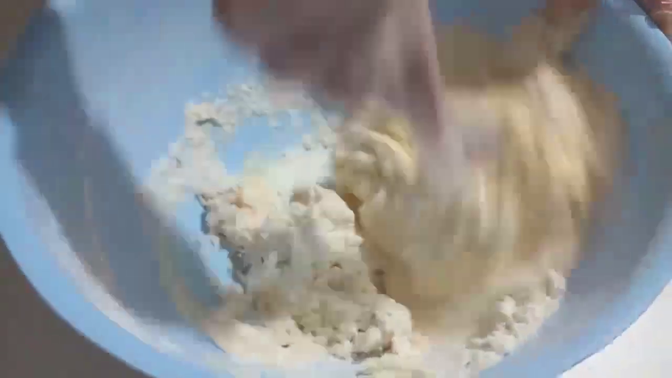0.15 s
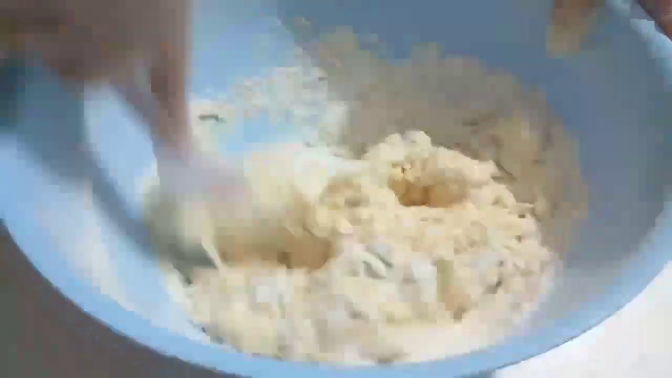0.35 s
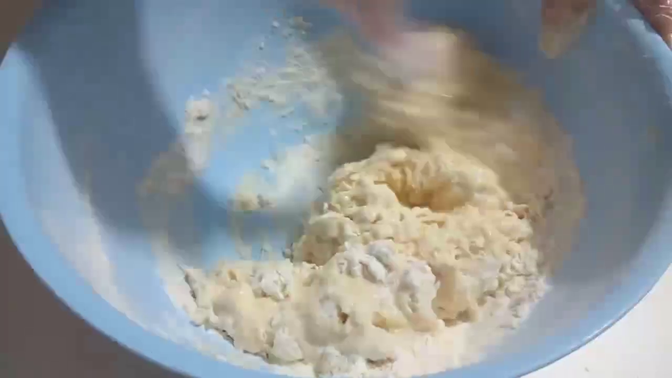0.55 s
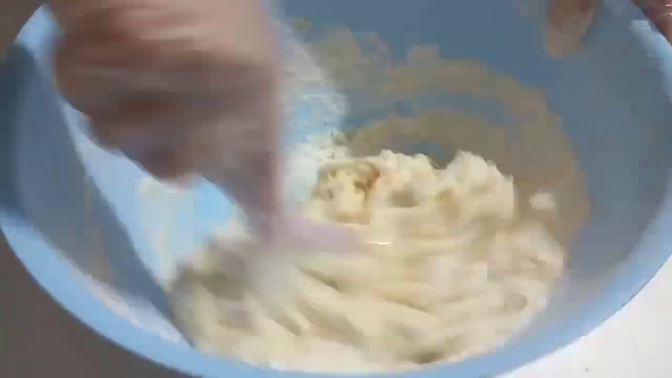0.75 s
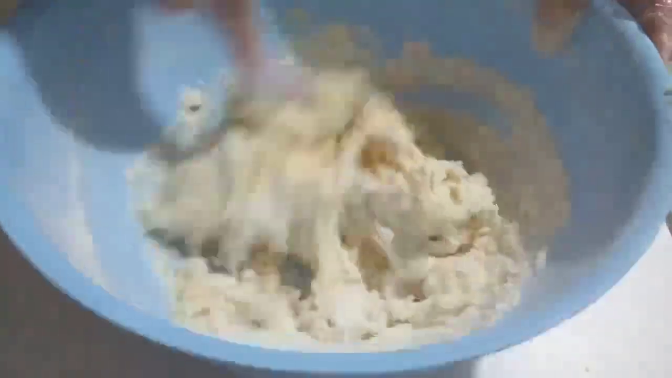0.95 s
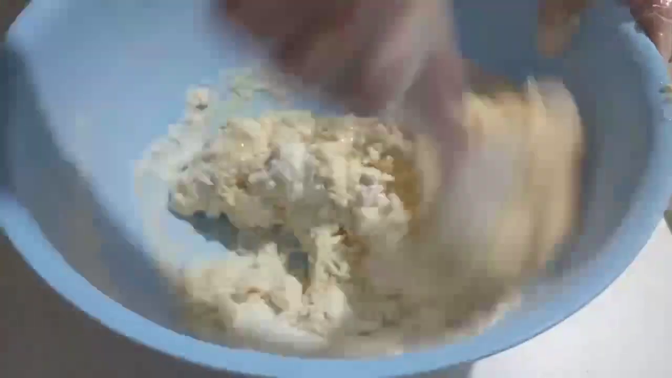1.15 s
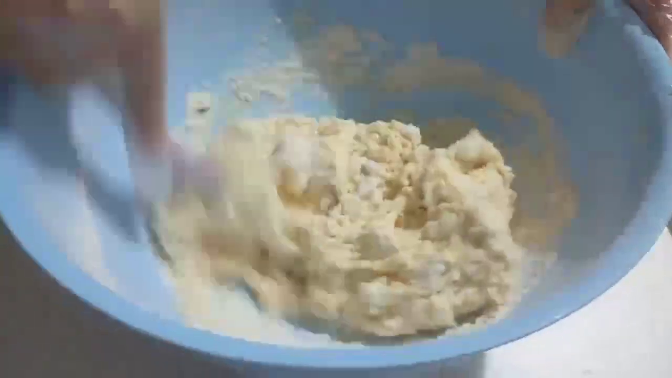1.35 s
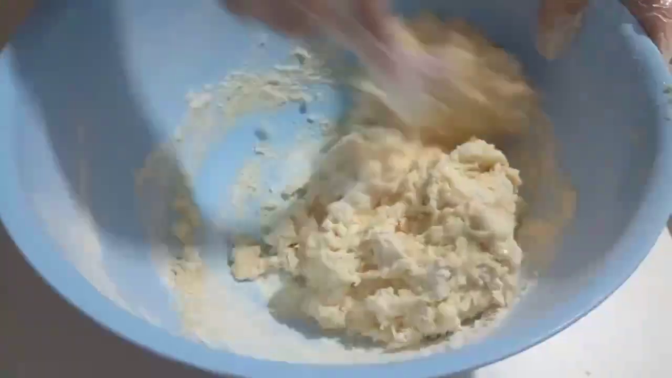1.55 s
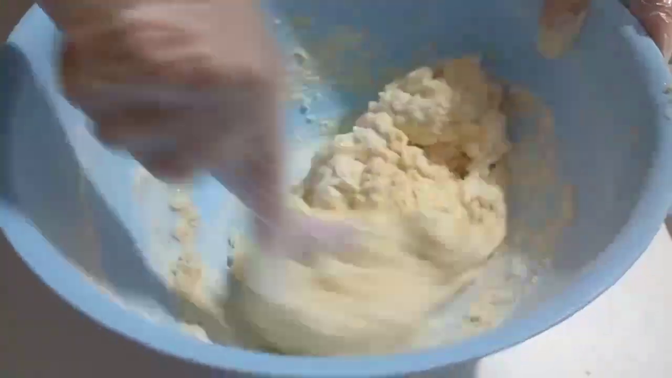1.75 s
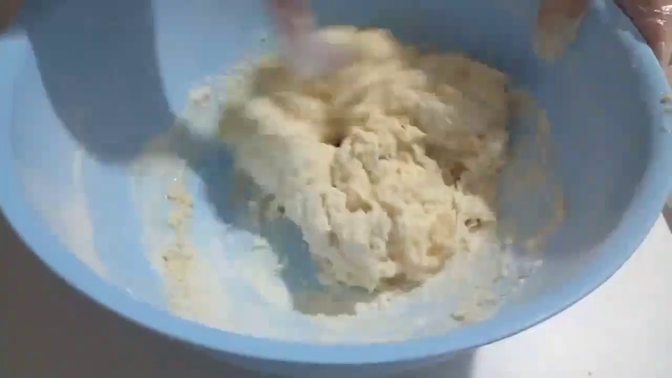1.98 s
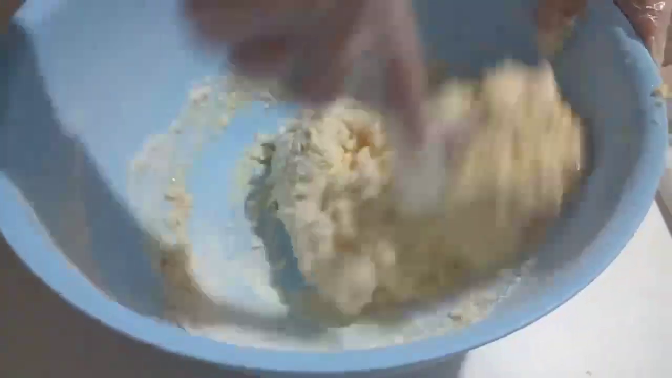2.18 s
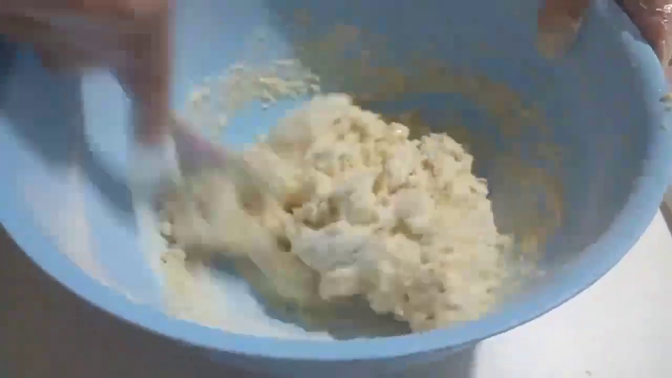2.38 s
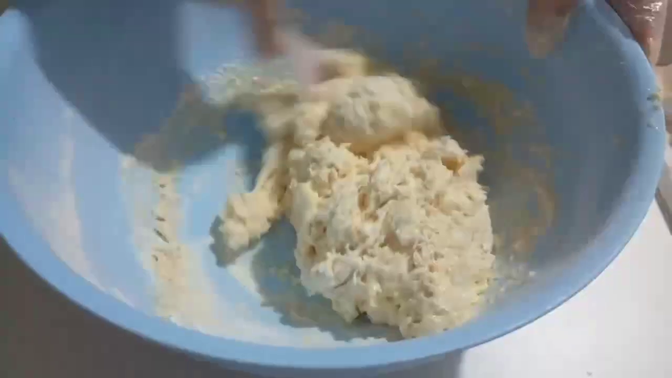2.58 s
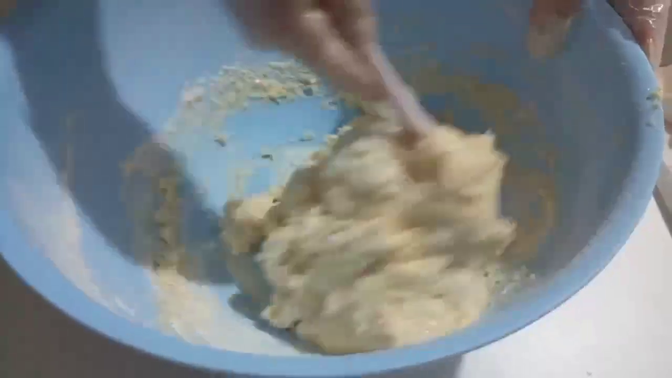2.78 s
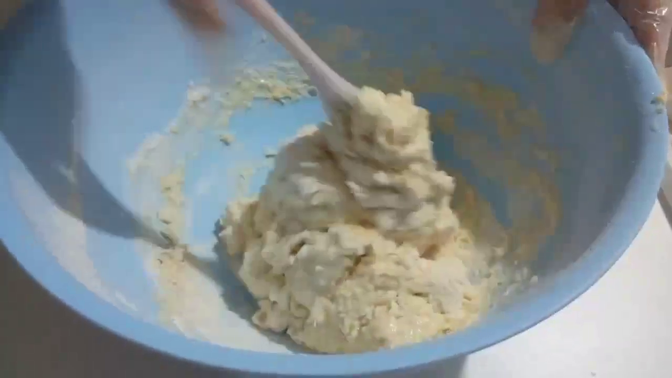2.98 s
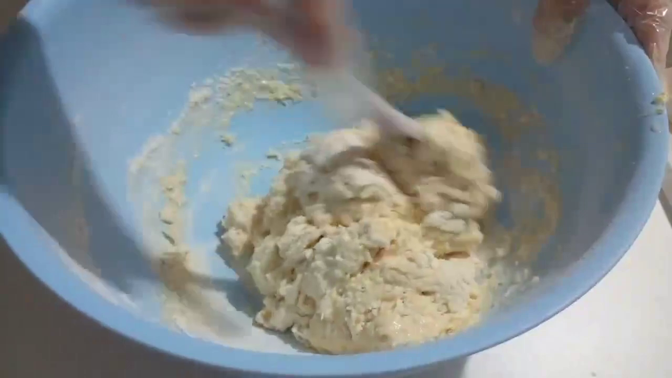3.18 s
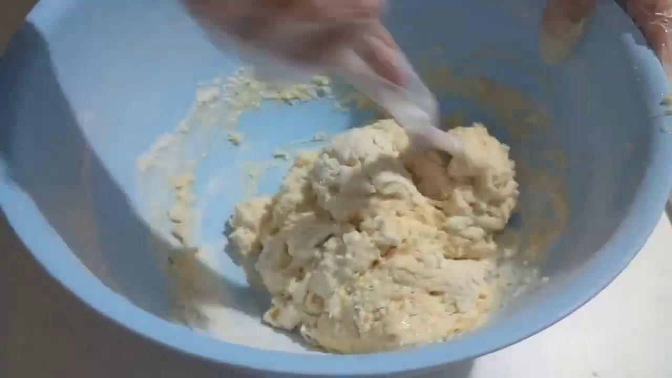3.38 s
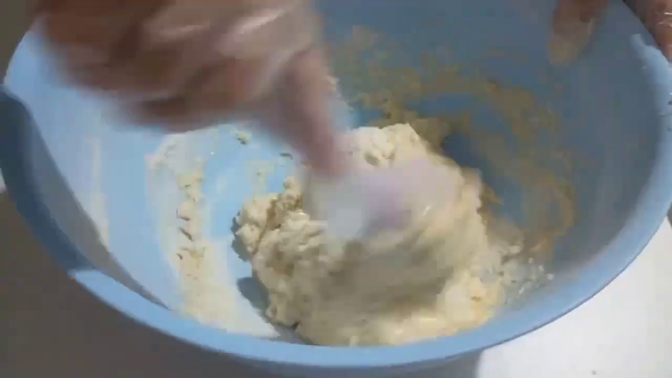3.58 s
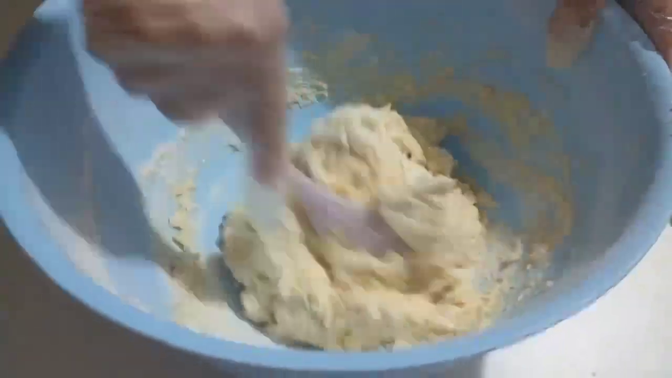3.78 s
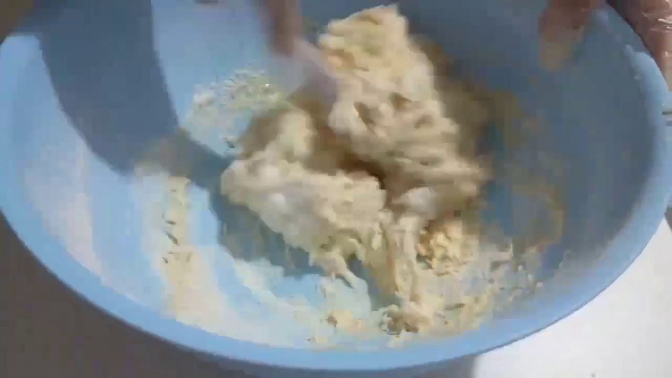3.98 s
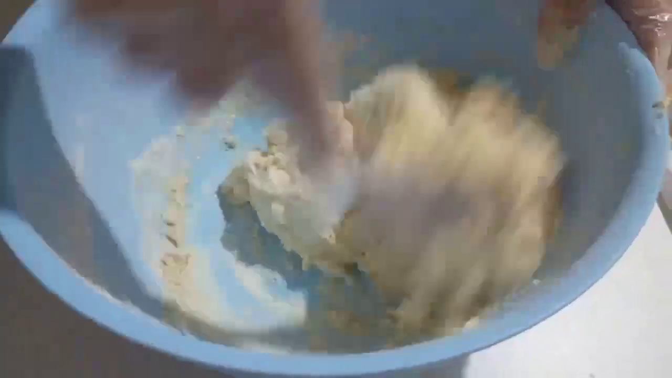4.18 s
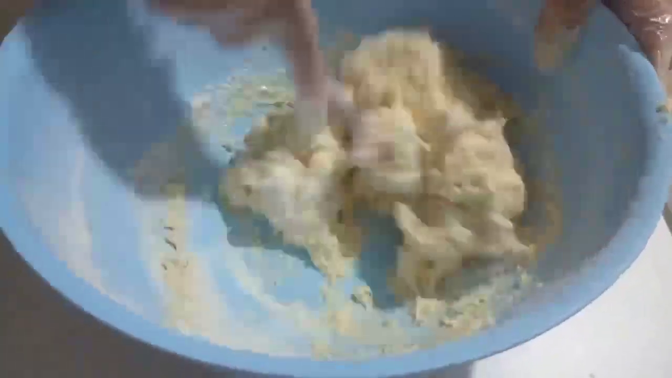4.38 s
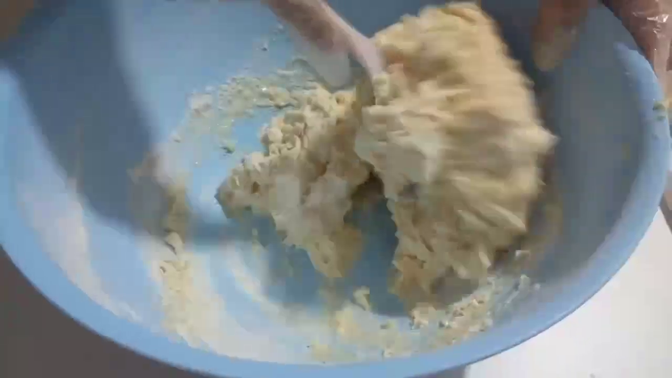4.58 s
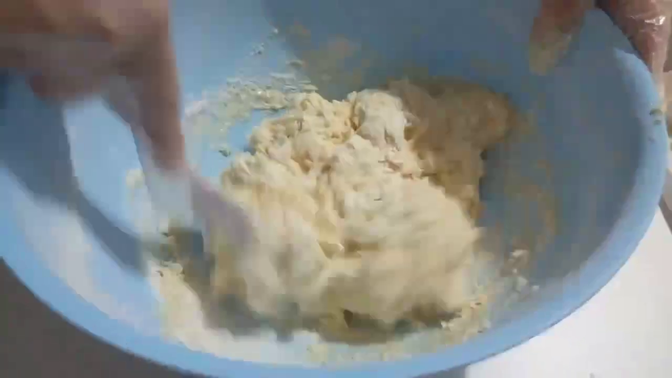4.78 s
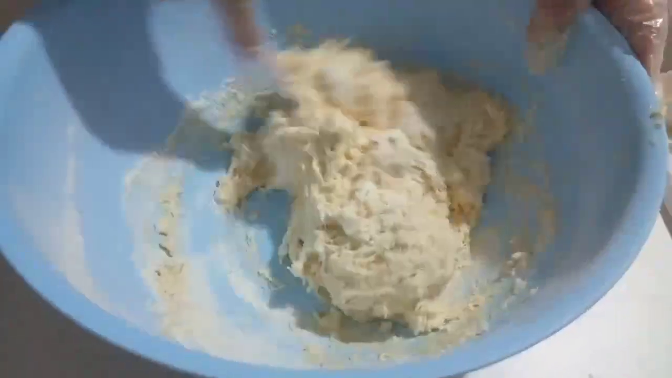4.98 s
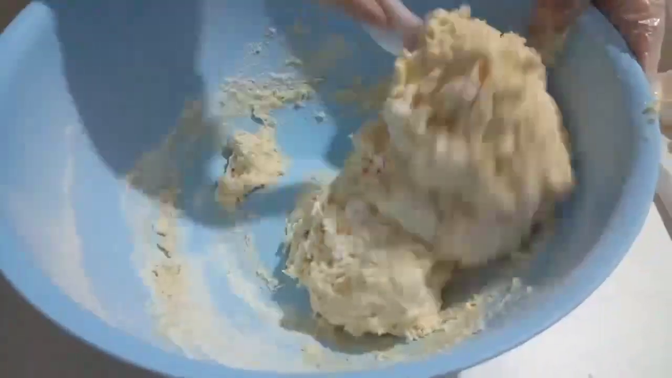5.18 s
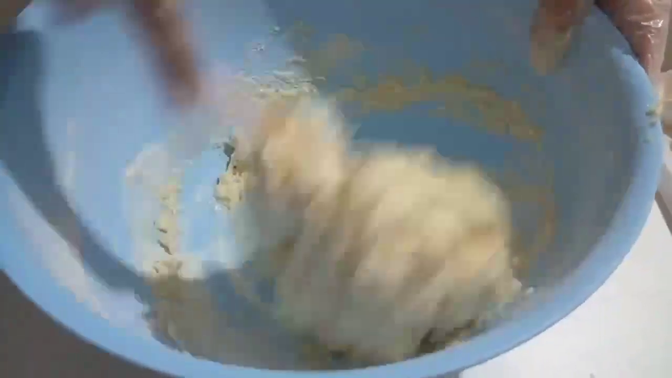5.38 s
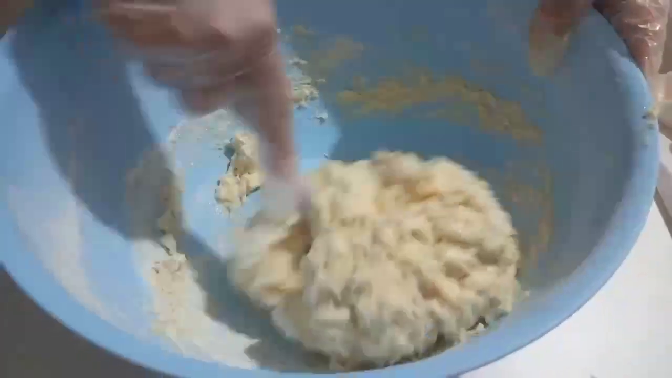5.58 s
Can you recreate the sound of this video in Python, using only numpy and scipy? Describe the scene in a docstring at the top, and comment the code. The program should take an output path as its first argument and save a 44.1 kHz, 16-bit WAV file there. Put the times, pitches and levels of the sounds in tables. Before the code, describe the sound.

A spatula folds wet dough in a big plastic basin: soft squishes, small pops, dull thuds, a heavy clunk late, faint hum behind.

```python
"""A soft wet squelch over a faint hum opens the scene: a spatula folding sticky dough, close to the microphone.
The blade judders and scrapes along a wide plastic bowl: irregular slip pulses, filtered and ringing the bowl.
Dough squelches, fizzes and peels off in clouds of tiny damped tones; larger air pockets pop singly.
Strokes and falling lumps thump the bowl on the worktop: damped modes plus filtered noise. Taps are noise cracks.
Behind them lie a short kitchen reverberation, an appliance's two unsteady tones and quiet room air."""
import sys
import numpy as np
from scipy import signal
from scipy.fft import rfft, irfft, next_fast_len
from scipy.io import wavfile
from scipy.ndimage import map_coordinates

SR = 44100
rng = np.random.default_rng(int(sys.argv[2]) if len(sys.argv) > 2 else 0)


def bounce(signal):
    """Save signal as a 16-bit WAV file at the path given by the first command-line argument."""
    frames = np.transpose(np.atleast_2d(signal))
    limited = np.clip(frames, -1, 1)
    pcm = np.round(limited * 32767).astype(np.int16)
    wavfile.write(sys.argv[1], SR, pcm)


N = 249165

# pushes of the blade along the wall; each reaches full level at full_level_s, after a quick swell:
# [full_level_s, length_s from there to the release, judder_db, scrape_db, boom_db], relative levels
BLADE_PUSHES = [(0.0, 0.054, -56.5, -63.5, -56), (0.218, .015, -49.5, -57, -46),
                (0.262, 0.033, -45.5, -53, -53), (0.35, 0.036, -42.5, -57, -57),
                (0.81, 0.036, -28.5, -44.5, -39.5), (.872, .03, -42, -49, -40.5),
                (0.927, 0.017, -38, -48.5, -40), (1.186, 0.034, -46, -55, -44),
                (1.272, 0.25, -52.5, -57.5, -52), (1.695, 0.068, -51.5, -65.5, -40.5),
                (1.787, 0.021, -38.5, -50, -53), (1.859, 0.059, -54, -55, -48.5),
                (1.938, 0.013, -43, -55, -49), (2.341, 0.069, -54.5, -57.5, -55),
                (2.424, 0.084, -48, -50, -39.5), (2.703, 0.023, -47.5, -53.5, -46.5),
                (2.913, .045, -58, -96, -50.5), (3.28, 0.078, -45.5, -60.5, -40.5),
                (3.5, 0.059, -44.5, -58, -46.5), (3.622, 0.048, -51, -60, -45.5),
                (3.676, 0.028, -44, -51, -39), (3.782, 0.063, -43.5, -57.5, -48.5),
                (4.236, 0.057, -48, -57.5, -40.5), (4.36, 0.062, -51.5, -59.5, -47),
                (4.617, 0.054, -49, -59, -49), (4.782, 0.062, -29.5, -48, -30.5),
                (4.91, 0.02, -34.5, -62, -38.5), (5.03, 0.094, -62, -65.5, -60.5),
                (5.379, 0.067, -45.5, -67, -43.5)]
# pulls that stretch and tear the dough:
# [peak_s, half_length_s, squelch_db, fizz_db, fold_pitch_hz], relative levels
DOUGH_PULLS = [(0.016, 0.045, -55.5, -64, 2500), (0.218, .04, -53, -63, 2880),
               (0.415, 0.033, -48, -58.5, 2800), (0.826, 0.03, -50, -60, 2650),
               (0.947, 0.016, -50, -61, 2650), (1.122, .04, -57, -65.5, 3100),
               (1.218, 0.012, -54.5, -57.5, 2610), (1.33, 0.052, -48.5, -58, 2750),
               (1.454, 0.054, -54, -62, 2490), (1.602, 0.05, -70, -69.5, 2650),
               (1.83, 0.071, -53, -64, 2760), (2.094, 0.047, -61, -69.5, 2900),
               (2.26, 0.03, -57.5, -62.5, 2800), (2.39, 0.048, -53, -62, 2620),
               (2.458, 0.041, -50.5, -55, 2570), (2.642, 0.066, -53.5, -61, 2540),
               (2.981, 0.059, -57, -57.5, 3230), (3.185, 0.065, -59, -60.5, 3150),
               (3.387, .02, -59, -58, 2670), (3.637, 0.013, -67, -61.5, 2400),
               (3.803, 0.041, -57.5, -63.5, 2530), (4.077, 0.095, -70, -70, 2870),
               (4.205, 0.046, -65.5, -64.5, 2600), (4.335, 0.048, -53.5, -61, 2690),
               (4.63, 0.018, -58.5, -67.5, 2750), (4.768, 0.0059, -40.5, -65, 2650),
               (4.844, 0.052, -56, -64.5, 2370), (4.963, 0.054, -53, -65, 2720),
               (5.081, 0.036, -55.5, -70, 2950), (5.525, 0.11, -73, -78, 2778)]
# ticking dough and the leaning hand between strokes: [time_s, squelch_db, fizz_db, boom_db], relative levels
BETWEEN_STROKES = [(0, -61, -66, -53.5), (.45, -54.5, -65.5, -51.5), (.58, -59, -68.5, -74),
                   (.76, -61.5, -68, -78), (1.0, -60, -70, -56), (1.6, -58.5, -68.5, -64),
                   (2.12, -64.5, -68, -52.5), (2.3, -59, -66.5, -56), (2.78, -68, -70, -49.5),
                   (3.05, -72.5, -70.5, -67), (3.3, -66, -88, -72), (3.45, -65, -67.5, -74),
                   (3.9, -61.5, -70.5, -75), (4.15, -73, -77, -76), (4.5, -65.5, -73, -72),
                   (4.95, -70, -66.5, -70), (5.2, -71.5, -75, -85), (5.65, -71.5, -78, -76)]
# dough peeling off the plastic: [peak_s, level_db, half_length_s]
DOUGH_SLURPS = [(0.02, -62, 0.032), (0.42, -60.5, 0.054), (0.832, -54, 0.019), (0.959, -54, 0.012),
                (1.34, -56, 0.016), (1.48, -58, 0.0089), (2.465, -62, 0.18), (2.694, -65, 0.024),
                (3.005, -65, 0.074), (3.392, -62.5, 0.02), (3.776, -59.5, 0.0089), (3.82, -51, 0.0051),
                (3.846, -54, 0.0027), (4.348, -55.5, 0.017)]
# single air pockets bursting: [start_s, tone_peak_db, pitch_hz, snap_db relative to the tone]
AIR_POCKETS = [(0.5455, -45.5, 3040, -15.5), (0.7944, -57, 1830, -16), (1.4547, -41.5, 2620, -12),
               (1.6922, -48, 2580, -6), (2.009, -52, 2650, -6), (2.0686, -53, 2700, -8),
               (2.0974, -43.5, 3200, -10), (2.1513, -47.5, 3040, -9), (3.177, -45.5, 2780, -9),
               (3.356, -61, 1580, -5), (3.3935, -39, 2590, -13), (4.0214, -53, 3300, -23),
               (4.1035, -54.5, 2600, 1), (4.213, -47.5, 2950, -7), (4.7081, -54.5, 2720, 1.5),
               (5.1673, -56.5, 3030, -2), (5.256, -52.5, 2600, -4), (5.2983, -59, 3060, 1),
               (5.3204, -51.5, 3040, -1.5), (5.5868, -53, 2620, -17)]
# bowl thumps:
# [start_s, relative_level_db, contact_brightness_hz, rocking_db, ring_length as a share of the free bowl's]
BOWL_THUMPS = [(0.342, -37.5, 795, -8, 0.5), (.806, -41, 650, -19, 0.86), (.824, -31.5, 700, -27, 0.83),
               (1.197, -35.5, 395, 9, 0.56), (1.665, -33, 268, 5, 0.71), (1.774, -36.5, 594, -14, 0.84),
               (1.898, -41, 497, 6, 0.26), (2.411, -38.5, 298, 1, 0.96), (2.713, -35.5, 440, 3.5, 0.85),
               (2.864, -37, 362, -4, 0.73), (3.232, -37, 130, 19, 0.75), (3.27, -25.5, 322, 3.5, 0.49),
               (3.313, -32.5, 199, 14, 0.46), (3.703, -34, 396, -18, 0.57), (4.221, -34.5, 348, -8, 0.82),
               (4.759, -23, 600, -11, 0.27), (4.765, -9.5, 680, -6, 0.88), (4.833, -24.5, 474, -15, 1),
               (4.921, -40, 400, 2, 0.83), (5.359, -25.5, 615, 5, 0.82), (5.39, -28.5, 330, 0, 0.6)]
# modes of the free bowl on the worktop: [pitch_hz, relative_level_db, t60_s]
BOWL_MODES = [(50, -30, .2), (70.4, -7, 0.13), (85.3, -7, 0.24), (137, 1, 0.37), (184, -3, 0.49),
              (222.6, -3, 0.37), (251.5, 1.5, 0.34), (285.4, -11, 0.48), (325.3, -7.5, 0.3),
              (351, -7.5, 0.18), (395, -11, 0.12), (448.4, -9.5, 0.31), (531, -9.5, 0.21),
              (560.7, -8, 0.21), (644, -21, 0.34), (720, -21, 0.31), (880, -11, 0.12), (952, -16, 0.27),
              (1360, -13, 0.29), (1485, -18, 0.42), (1715, -11, 0.17)]
# taps of the spatula on the plastic: [start_s, peak_db, contact_brightness_hz]
SPATULA_TAPS = [(0.217, -30, 12000), (0.2559, -18.5, 15000), (0.7715, -42, 9000), (3.271, -39.5, 3500),
                (4.7577, -32.5, 3300), (4.7668, -24.5, 4500)]

# spectra of the sources, each: [frequency_hz, relative_level_db per Hz]
JUDDER_SPECTRUM = [(40, -36), (100, -17.5), (170, -9.5), (240, 0), (330, -3.5), (440, -11), (560, -16),
                   (700, -23.5), (1200, -50), (3000, -93.5)]  # blade sticking and slipping
SCRAPE_SPECTRUM = [(350, -37.5), (600, -5), (800, 0.5), (1100, -3.5), (1600, 3.5), (2200, -4),
                   (3200, -18.5), (4200, -28.5), (8000, -33.5)]  # crumbs between blade and wall
SQUELCH_SPECTRUM = [(100, -60), (700, -24), (1400, -22.5), (2000, -8.5), (2600, -3.5), (3200, -1),
                    (4000, -9), (5200, -8.5), (6500, -13), (7700, -32), (10000, -47)]  # wet dough tearing
FIZZ_SPECTRUM = [(4000, -8), (6500, -4.5), (7900, -20.5), (9500, -9.5), (11000, -4.5), (12500, 0.5),
                 (13800, -2), (15000, -14), (16000, -8)]  # finest threads of dough
SLURP_SPECTRUM = [(1000, -52), (2500, 3.5), (3800, 0.5), (5000, -1), (6400, 0.5), (7700, -15.5),
                  (12000, -17), (16000, -28)]  # air sipped in under the dough
CLATTER_SPECTRUM = [(20, -32), (70, 6), (250, 3), (400, -1.5), (550, -1), (700, -10.5), (1100, -6),
                    (1700, -6), (3000, -2), (5000, -24), (9000, -7)]  # bowl's foot rattling
BOOM_SPECTRUM = [(20, -25), (48, 1), (62, -2), (85, 4.5), (130, 3), (180, -2.5), (300, -28.5), (1000, -91)]  # bowl rocking under the lump
TAP_SPECTRUM = [(150, -24), (500, 7), (1000, -6.5), (1700, 3), (2300, -3.5), (3000, 4.5), (4000, -10),
                (6000, -16.5), (8000, -20.5), (12000, -21), (16000, -29)]  # spatula on plastic
AIR_SPECTRUM = [(20, -7), (45, 9), (90, -9), (130, -8), (200, -2), (400, -2), (520, -2), (700, -12),
                (1100, -28), (3000, -18), (8000, -30.5), (15000, -28)]  # quiet room air
# decay of the kitchen: [frequency_hz, t60_s]
KITCHEN_DECAY = [(100, 0.27), (500, 0.65), (3000, 0.4), (12000, 1)]

PUSH_ATTACK_S, PUSH_SAG_DB_PER_S, PUSH_RELEASE_DB_PER_S = 0.017, 28, 240  # the blade bites, eases, lets go
PUSH_SQUELCH_DB = -2  # dough squeezed under the blade, relative to the scrape push
PULL_RISE, PULL_FALL = 1.06, 1  # widths of the swell before and after its peak, in half lengths
FOLD_HZ, FOLD_PRESSED_HZ = 2780, 2500  # pitch of the folds at rest and under the blade
FOLD_WANDER_OCTAVES = 0.068  # scale of their random drift


def amp(db):
    """Decibels to gain."""
    return 10 ** (np.asarray(db) / 20)


def unit(x):
    """x scaled to rms 1."""
    return x / np.sqrt(np.mean(x ** 2) + 1e-20)


def along(points, hz):
    """(Hz, value) points read on a log axis."""
    f, v = np.transpose(points)
    return np.interp(np.log(hz + 1), np.log(f + 1), v)


def curves(rows):
    """One value per sample for each column after the time."""
    s, *cols = np.transpose(rows)
    return [np.interp(np.arange(N) / SR, s, c) for c in cols]


def wobble(rate):
    """A smooth random curve, rate knots a second."""
    knots = rng.standard_normal(int(N * rate / SR) + 4)
    return map_coordinates(knots, [np.arange(N) * rate / SR])


def add(track, s, sound):
    """Mix a sound into the track at time s."""
    room_left = track[max(round(s * SR), 0):][:len(sound)]
    room_left += sound[:len(room_left)]


def coloured(x, spectrum, size=8192):
    """x through the causal filter of energy 1 that has this spectrum."""
    cepstrum = irfft(np.log(amp(along(spectrum, np.fft.rfftfreq(size, 1 / SR)))))
    # folding the cepstrum forward in time gives minimum phase
    cepstrum[1:size // 2] *= 2
    cepstrum[size // 2 + 1:] = 0
    kernel = irfft(np.exp(rfft(cepstrum)))
    return signal.fftconvolve(x, kernel / np.linalg.norm(kernel))[:len(x)]


def lowpassed(x, order, cutoff_hz):
    """x with the treble above the cutoff rolled off."""
    return signal.lfilter(*signal.butter(order, cutoff_hz, fs=SR), x)


def slips(rate, spread_db):
    """Irregular pulses of uneven size, rate a second on average, rms 1."""
    happens = rng.random(N) < rate / SR
    sign = rng.choice([-1, 1], N)
    size = amp(spread_db * np.clip(rng.standard_normal(N), -2, 2))
    return unit(happens * sign * size)


def bursts(rate, centre_hz, octaves, cycles, spread_db, size=256):
    """Tiny films of dough breaking: short damped tones scattered around a pitch, rms 1."""
    when, pitch, strength, phase = rng.random((int(rate * N / SR), 4)).T[:, :, None]
    start = (when * N).astype(int)
    hz = np.broadcast_to(centre_hz, N)[start] * 2 ** (octaves * (pitch - .5))
    turns = hz * np.arange(size) / SR
    loudness = amp(-spread_db * np.log(strength + 0.016))
    grains = loudness * np.exp(-turns / cycles) * np.sin(2 * np.pi * (turns + phase))
    return unit(np.bincount((start + np.arange(size)).ravel(), grains.ravel(), N)[:N])


def pushes():
    """Gains of judder, scrape and boom: every push swells quickly, sags while it lasts and dies away."""
    t, gains = np.arange(N) / SR, np.zeros((3, N))
    for full_level_s, length, *levels_db in BLADE_PUSHES:
        bite = np.exp(-np.maximum((full_level_s - t) / PUSH_ATTACK_S, 0) ** 2)
        sag_db = PUSH_SAG_DB_PER_S * np.clip(t - full_level_s, 0, length)
        release_db = PUSH_RELEASE_DB_PER_S * np.maximum(t - full_level_s - length, 0)
        gains = np.maximum(gains, amp(levels_db)[:, None] * bite * amp(-sag_db - release_db))
    return gains


def bowl_ring(rocking_db, length, scatter_db, scatter_turns):
    """Damped modes answer a push, their starts scattered; the lowest modes rock on the worktop."""
    t = np.arange(int(.8 * SR)) / SR
    hz, db, t60 = np.transpose(BOWL_MODES)[:, :, None]
    db = db + rocking_db / (1 + (hz / 170) ** 4) + scatter_db * rng.standard_normal(hz.shape)
    fade = amp(db - 60 * t / (t60 * length))
    turns = hz * t + scatter_turns * rng.standard_normal(hz.shape)
    return np.sum(fade * np.sin(2 * np.pi * turns), axis=0)


def judder(push, bright_hz, ring_share):
    """The blade sticks and slips: dull pushes, part of which ring the bowl's modes."""
    pulses = slips(rate=500, spread_db=2.5) * push * amp(-0.5 + 1.6 * wobble(30))
    ring = bowl_ring(rocking_db=-16, length=0.73, scatter_db=1.3, scatter_turns=0.24)
    ring = lowpassed(ring, 3, bright_hz)
    rung = signal.fftconvolve(pulses, ring / np.linalg.norm(ring))[:N]
    share = np.clip(ring_share, 0, 1)  # of the power
    return np.sqrt(1 - share) * coloured(pulses, JUDDER_SPECTRUM) + np.sqrt(share) * rung


def scrape(push, sliding_db):
    """Floury crumbs grate between blade and wall, faintly also while the blade only slides."""
    rest_db, _, _ = curves(BETWEEN_STROKES)
    level = np.hypot(push, amp(rest_db + sliding_db))
    grating = slips(rate=1500, spread_db=0.5) * level
    return coloured(grating * amp(-1.37 + 1.5 * wobble(60)), SCRAPE_SPECTRUM)


def pulls():
    """Squelch and fizz gains and fold pitch: every pull swells and fades over the resting dough's ticking."""
    t = np.arange(N) / SR
    power, fold_hz = amp(curves(BETWEEN_STROKES)[:2]) ** 2, FOLD_HZ
    for s, half, squelch_db, fizz_db, hz in DOUGH_PULLS:
        width = half * np.where(t < s, PULL_RISE, PULL_FALL)
        swell = amp([[squelch_db], [fizz_db]]) ** 2 * np.exp(-((t - s) / width) ** 2)
        power = power + swell
        # the pitch leans to this pull by its share of the squelch power
        fold_hz = fold_hz + (hz - fold_hz) * swell[0] / power[0]
    return *np.sqrt(power), fold_hz


def squelch(push, smack_db):
    """Wet dough tears in small bursts; folds smack, lower under the blade, and the finest threads fizz."""
    tearing, fizzing, free_hz = pulls()
    squeezing = amp(PUSH_SQUELCH_DB) * push
    level = np.hypot(tearing, squeezing)
    fold_hz = free_hz + (FOLD_PRESSED_HZ - free_hz) * (squeezing / level) ** 2
    fold_hz = fold_hz * 2 ** (FOLD_WANDER_OCTAVES * wobble(10.5))
    clumps = wobble(70)  # shared, so that squelch and fizz swell together
    wet = bursts(rate=2400, centre_hz=3485, octaves=2.25, cycles=2.05, spread_db=-0.5)
    wet = unit(coloured(wet, SQUELCH_SPECTRUM))
    smack = bursts(rate=600, centre_hz=fold_hz, octaves=0.44, cycles=6.3, spread_db=0.5, size=512)
    smack = unit(signal.lfilter(*signal.butter(2, [1800, 4200], "band", fs=SR), smack))
    fine = bursts(rate=4000, centre_hz=9020, octaves=1.4, cycles=1.2, spread_db=0.5)
    fine = unit(coloured(fine, FIZZ_SPECTRUM))
    tears = (wet + amp(smack_db) * smack) * level * amp(-3 + 1.42 * clumps)
    return tears + fine * fizzing * amp(-1.8 + 2.3 * clumps)


def slurps():
    """Air sips in under the dough as it lets go of the plastic: a short swell of bright crackle."""
    t = np.arange(N) / SR
    swell = sum(amp(db) * np.exp(-.5 * ((t - s) / half) ** 2) for s, db, half in DOUGH_SLURPS)
    crackle = bursts(rate=2200, centre_hz=4900, octaves=1.26, cycles=5.3, spread_db=3.5)
    return swell * unit(coloured(crackle, SLURP_SPECTRUM))


def pops(cycles):
    """A larger air pocket opens with a snap and rings for a few cycles."""
    out, t = np.zeros(N), np.arange(SR // 50) / SR
    for s, db, hz, snap_db in AIR_POCKETS:
        fade = np.exp(-t * hz / cycles)
        snap = coloured(rng.standard_normal(len(t)) * fade, SLURP_SPECTRUM)
        snap += 0.63 * coloured(rng.standard_normal(len(t)) * fade, FIZZ_SPECTRUM)
        tone = fade * np.sin(2 * np.pi * hz * t)
        add(out, s, amp(db) * (tone + amp(snap_db) * snap))
    return out


def thumps(clatter_db, clatter_t60):
    """Each blow rings the bowl and rattles its foot; dough cushions the contact and takes the treble."""
    out = np.zeros(N)
    for s, db, bright_hz, rocking_db, length in BOWL_THUMPS:
        ring = bowl_ring(rocking_db, length, scatter_db=2.5, scatter_turns=0.19)
        t = np.arange(len(ring)) / SR
        rattle_fade = amp(clatter_db - 60 * t / (clatter_t60 * length))
        clatter = coloured(rng.standard_normal(len(t)) * rattle_fade, CLATTER_SPECTRUM)
        blow = lowpassed(ring + clatter, 2, bright_hz)
        add(out, s, amp(db - 19) * unit(blow))
    return out


def boom(push, groan_hz, groan_db):
    """The lump's weight rocks the bowl and makes its wall groan."""
    _, _, lean_db = curves(BETWEEN_STROKES)
    rocking = coloured(slips(rate=300, spread_db=-1.5), BOOM_SPECTRUM)
    groan_level = amp(groan_db + 1.9 * wobble(25.04))
    groan = groan_level * np.sin(2 * np.pi * groan_hz * np.arange(N) / SR + 0.84 * wobble(18))
    return amp(-5.0) * np.hypot(push, amp(lean_db)) * (rocking + groan)


def taps(contact_t60, ring_db, ring_t60):
    """The spatula clacks on the plastic: a hard crack and a short ring, duller where dough coats the blade."""
    out, t = np.zeros(N), np.arange(SR // 8) / SR
    for s, db, bright_hz in SPATULA_TAPS:
        fade = amp(-60 * t / contact_t60) + amp(ring_db - 60 * t / ring_t60)
        clack = coloured(rng.standard_normal(len(t)) * fade, TAP_SPECTRUM)
        clack = lowpassed(clack, 2, bright_hz)
        add(out, s, amp(db) * clack / np.abs(clack).max())
    return out


def kitchen(x):
    """The walls' answer, noise in which each frequency dies at its own speed."""
    hz, t, z = signal.stft(rng.standard_normal(SR // 2), SR, nperseg=256)
    fade = amp(-60 * t / along(KITCHEN_DECAY, hz)[:, None])
    tail = signal.istft(z * fade, SR, nperseg=256)[1]
    delayed = np.pad(tail / np.linalg.norm(tail), (SR // 200, 0))  # 5 ms behind the direct sound
    return signal.fftconvolve(x, delayed)[:N]


def appliance(hum_hz, hum_db, drone_hz, drone_db, air_db):
    """A motor's slightly unsteady tones over the quiet air of the room."""
    t = np.arange(N) / SR
    hum = amp(hum_db + 0.12 * wobble(12)) * np.sin(2 * np.pi * hum_hz * t + 0.13 * wobble(3.7))
    drone = amp(drone_db + 1.2 * wobble(5.1)) * np.sin(2 * np.pi * drone_hz * t + 0.95 * wobble(13))
    return hum + drone + amp(air_db) * coloured(rng.standard_normal(N), AIR_SPECTRUM)


def scene():
    """Bowl and dough near the microphone, the kitchen behind them."""
    juddering, scraping, booming = pushes()
    body = thumps(clatter_db=0.5, clatter_t60=0.31)
    body += boom(booming, groan_hz=134.1, groan_db=4.0)
    body += judder(juddering, bright_hz=565, ring_share=0.34)
    dough = squelch(scraping, smack_db=-3) + slurps() + pops(cycles=8.6)
    surface = dough + scrape(scraping, sliding_db=-7)
    surface += taps(contact_t60=0.011, ring_db=-15.5, ring_t60=0.056)
    room = kitchen(amp(-17) * body + amp(-8.5) * surface)
    background = appliance(hum_hz=492.4, hum_db=-59, drone_hz=130, drone_db=-74.0, air_db=-63)
    return (body + surface + room + background)[None]


def record(dry):
    """The small microphone loses the deepest bass; nothing is kept above the band limit."""
    thin = signal.sosfilt(signal.butter(4, 43, "high", fs=SR, output="sos"), dry)
    size = next_fast_len(N + SR // 4)
    kept = np.fft.rfftfreq(size, 1 / SR) < 15750  # band limit in Hz
    return irfft(rfft(thin, size) * kept, size)[:, :N]


dry = scene()
out = record(dry)
bounce(out)
```